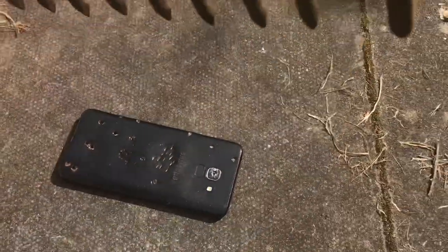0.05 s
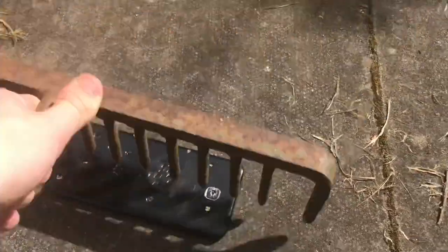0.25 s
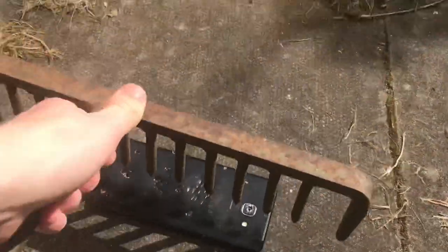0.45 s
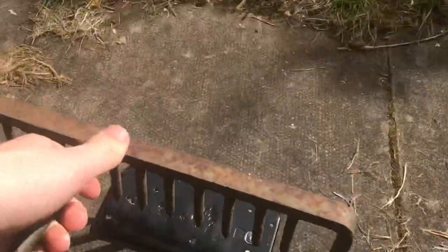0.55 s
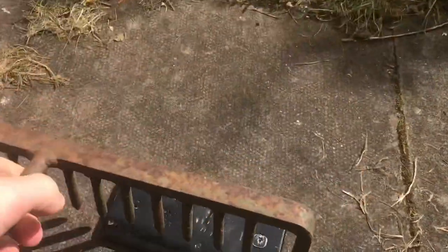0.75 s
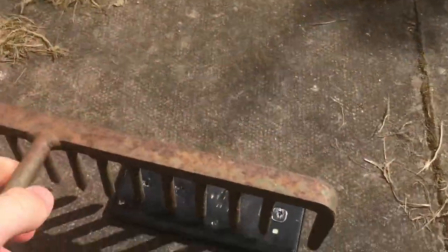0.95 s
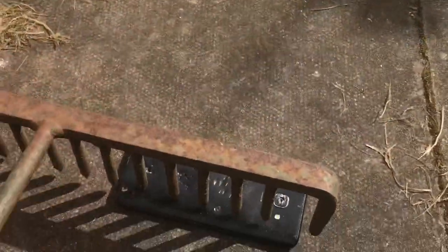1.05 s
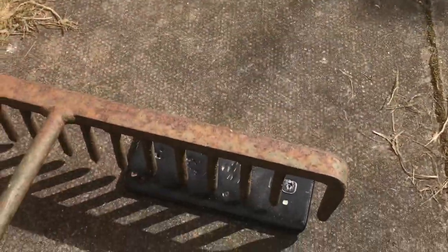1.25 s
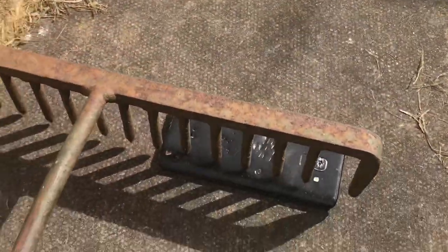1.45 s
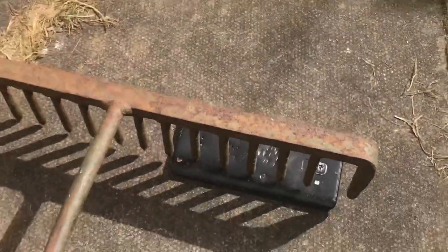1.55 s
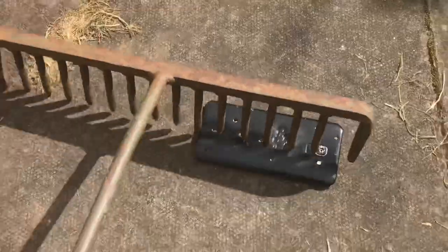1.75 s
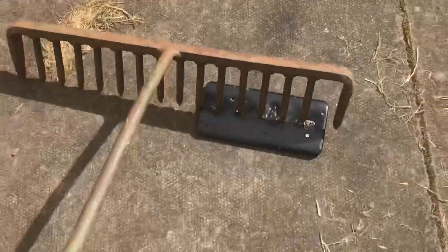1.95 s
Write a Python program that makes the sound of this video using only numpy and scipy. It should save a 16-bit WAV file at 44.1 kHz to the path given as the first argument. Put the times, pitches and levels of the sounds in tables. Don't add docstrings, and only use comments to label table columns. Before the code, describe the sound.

Steel rake head hits a concrete slab with a sharp clank, followed by gritty scraping and ticks.

```python
import sys
import numpy as np
from scipy import signal
from scipy.io import wavfile

SR = 44100
rng = np.random.default_rng(int(sys.argv[2]) if len(sys.argv) > 2 else 0)


def gain_from_decibels(decibels):
    exponent = np.asarray(decibels, float) / 20
    return 10 ** exponent


def inscribe(sig):
    pcm = np.round(np.clip(np.atleast_2d(sig).T, -1, 1) * 32767)
    wavfile.write(sys.argv[1], SR, pcm.astype(np.int16))


N = 88200
T = np.arange(N) / SR
# [f/Hz, width/Hz, level/dB]
FIRST_MODES = [(251.8, 140, -16.5), (384, 17, -6), (548.5, 20, 0), (1131, 210, -12), (1396, 160, -10.5),
               (1515, 56, -4), (1732, 28, -2.5), (2690, 60, -16.5), (5630, 33, -20.5), (8360, 70, -28)]
# [f/Hz, width/Hz, level/dB]
SECOND_MODES = [(558.5, 14.8, -1), (1170, 40, 0.5), (1581, 54, 3), (1870, 59, -0.5), (2047, 40, 0),
                (2352, 250, -9), (5830, 50, -6), (8080, 110, -7.5), (8610, 82, -7.5), (12440, 33, -14),
                (13220, 210, -17), (14201, 63, -11)]


def evened(x):
    return x / np.sqrt(np.mean(x ** 2) + 1e-20)


def curve(rows, axis):
    rows = np.array(rows)
    return np.interp(T, rows[:, 0], rows[:, axis], left=-120, right=-120)


def colour(x, points):
    f, db = np.transpose(points)
    hz = np.fft.rfftfreq(1024, 1 / SR)
    logs = np.log(gain_from_decibels(np.interp(np.log(hz + 1), np.log(f + 1), db)))
    full = np.concatenate([logs, logs[-2:0:-1]])
    taps = np.fft.ifft(np.exp(np.conj(signal.hilbert(full)))).real
    return signal.oaconvolve(x, taps / np.linalg.norm(taps))[:N]


def modes(x, table, widen):
    click = np.eye(1, 8000)[0]
    response = 0
    for k, (hz, width, db) in enumerate(table):
        r = np.exp(-np.pi * width * widen / SR)
        poles = [1, -2 * r * np.cos(2 * np.pi * hz / SR), r * r]
        response = response + (-1) ** k * gain_from_decibels(db) * (1 - r) * signal.lfilter([1, 0, -1], poles, click)
    return signal.oaconvolve(x, response / np.linalg.norm(response))[:N]


def band(x, lo_hz, hi_hz):
    return signal.sosfilt(signal.butter(2, [lo_hz, hi_hz], "band", fs=SR, output="sos"), x)


def bursts(times, dbs, length, rise):
    total = 0
    for start, db in zip(times, dbs):
        u = np.clip(T - start, 0, 1)
        total = total + gain_from_decibels(db - 8.37 * u / length) * np.minimum(u / rise, 1)
    return total


def background():
    # [t/s, f/Hz, level/dB]
    engine = [(0, 71, -44.5), (.19, 75.8, -47.5), (.3, 54.56, -62.5), (1.15, 48.42, -50.5),
              (1.3, 52.87, -50.5), (1.88, 54.6, -44.5), (2, 53.26, -53)]
    # [multiple of the firing rate, level/dB]
    orders = [(1, 2), (2, -10), (3, -18)]
    # [f/Hz, level/dB per Hz]
    air_spectrum = [(40, -3.5), (194, -14), (392, -29), (990, -24.5), (1520, -19), (1800, -33.5),
                    (16000, -52)]
    turns = np.cumsum(curve(engine, axis=1)) / SR
    hum = 0
    for k, db in orders:
        lumps_db = 2.3 * evened(band(rng.standard_normal(N), 1.4, 9))
        hum = hum + gain_from_decibels(db + lumps_db) * np.sin(2 * np.pi * k * turns)
    air = colour(rng.standard_normal(N), air_spectrum)
    return gain_from_decibels(curve(engine, axis=2) - 2) * hum + gain_from_decibels(-54.5) * evened(air)


def slide():
    # [t/s, shaft level/dB, hiss level/dB]
    rubbing = [(0, -53, -53), (.065, -71, -62), (.16, -79, -50), (.84, -66.5, -77), (.885, -73.5, -62.5),
               (.97, -53, -53), (1.105, -57, -48.5), (1.165, -62, -70.5), (1.275, -62.5, -86),
               (1.305, -53.5, -51.5), (1.42, -62, -55), (1.505, -75.5, -63), (1.79, -49, -52.5),
               (1.865, -65.5, -55.5), (2, -55.5, -54)]
    # [f/Hz, width/Hz, level/dB]
    shaft_modes = [(354.3, 43, -2.5), (1165, 26, -2.5), (1270, 41, -3.5), (1790, 180, -15),
                   (3070, 180, -20)]
    # [f/Hz, level/dB per Hz]
    hiss_spectrum = [(2000, -4), (4000, -7.5), (10500, -9), (13000, -5.5), (16000, -6)]
    rub = gain_from_decibels(curve(rubbing, axis=1) - 2.0) * rng.standard_normal(N)
    hiss = gain_from_decibels(curve(rubbing, axis=2) - 5.0) * rng.standard_normal(N)
    return modes(rub, shaft_modes, 1) + band(colour(hiss, hiss_spectrum), 1800, 16500)


def head_ring(waver_db):
    # [t/s, level/dB]
    ring = [(0, -69), (.83, -89), (.875, -61), (1.01, -57.5), (1.24, -60.5), (1.44, -70.5), (2, -65)]
    ring_hz = 1468
    return gain_from_decibels(curve(ring, axis=1) + 4 + waver_db / 2) * np.sin(2 * np.pi * ring_hz * T)


def knocks(rows, body, widen, chatter_s):
    push = np.zeros(N)
    luck = rng.random((len(rows), 2, 5))
    first = np.arange(5) == 0
    for (s, db, ms), (late, size) in zip(rows, luck):
        near = slice(round(s * SR) - 100, round(s * SR) + 900)
        late = late * np.arange(5) / 4
        size = np.where(first, 1, 2 * size - 1)
        u = (T[near, None] - s - chatter_s * late) * 1000 / np.clip(ms, .03, 2)
        shape = np.sin(np.pi * np.clip(u + .25, 0, 1))
        push[near] += gain_from_decibels(db + 20.5) * (shape / (shape.sum(0) + 1e-9)) @ size / np.linalg.norm(size)
    return modes(push, body, widen)


def catches():
    # [t/s, level/dB, contact/ms]
    touches = [(.009, -45.5, 0.15), (.02, -45, 0.26), (.033, -29.5, 0.56), (.131, -46, .1), (.19, -44, .1),
               (.202, -39.5, 0.12), (.2135, -28.5, 0.087), (.217, -27, .1)]
    # [t/s, level/dB, contact/ms]
    snags = [
        [(.384, -31, .15), (.45, -33, 0.35), (.468, -29, .3), (.481, -23, 0.51), (.508, -24.5, 0.36),
         (.5365, -22.5, 0.1), (.554, -23, 0.071), (.588, -25, 0.064), (.601, -26, 0.16), (.61, -21, 0.54),
         (.645, -24, 0.36), (.657, -20.5, 0.44), (.684, -28.5, 0.57)],
        [(1.592, -30, 0.22), (1.626, -17.5, 0.82), (1.67, -26, .12), (1.690, -30.5, .15), (1.70, -32, 0.079),
         (1.709, -34, 0.098)],
    ]
    # [t/s, level/dB, contact/ms]
    pings = [
        [(.6, -54, 0.033), (.682, -43.5, 0.023), (.72, -44, 0.024)],
        [(1.577, -44, .06), (1.5895, -28.5, 0.023), (1.596, -32, .05), (1.6225, -39, .03), (1.667, -47, 0.069),
         (1.686, -49, .03), (1.7035, -37.5, 0.029)],
    ]
    # [f/Hz, width/Hz, level/dB]
    touch_modes = [(523, 35, -2.5), (1770, 160, -2.5), (2550, 210, -1), (3217, 70, -2.5), (3930, 110, -8),
                   (5250, 140, -5.5)]
    # [f/Hz, width/Hz, level/dB]
    tine_modes = [(5060, 70, -1), (6169, 40, -5), (7185, 22, 1), (8450, 25, -4), (8757, 10, -3)]
    low = [m for m in SECOND_MODES if m[0] < 3200]
    high = [m for m in SECOND_MODES if m[0] >= 3200]
    out = knocks(touches, touch_modes, 0.83, 0.0026)
    out = out + knocks(snags[0], FIRST_MODES[:8], 1.46, 0.0054) + knocks(snags[1], low, 0.82, 0.00603)
    return out + knocks(pings[0], tine_modes, 1, 0.000277) + knocks(pings[1], high, 0.97, .004)


def ticks(rows, body_db, length):
    s, db, top_db = np.transpose(rows)
    mid = bursts(s, db, length, .0008) * rng.standard_normal(N)
    treble = bursts(s, db + top_db, length, .001) * rng.standard_normal(N)
    crack = gain_from_decibels(-4.0) * band(mid, 1500, 5700)
    return crack + gain_from_decibels(body_db) * band(mid, 500, 1000) + gain_from_decibels(-5.0) * band(treble, 5600, 19000)


def grit():
    grains_per_s, spread_db = 980, 4.5
    hits = rng.random(N) < grains_per_s / SR
    size = gain_from_decibels(spread_db * np.minimum(rng.exponential(1, N), 3.0)) * hits
    smeared = signal.lfilter([1], [1, -.88], size)
    return evened((smeared + .5) * rng.standard_normal(N))


def drag(rows, body, widen, rough_db, hiss_db, tine_db, climb_db):
    press = gain_from_decibels(curve(rows, axis=1)) * grit()
    fine = gain_from_decibels(curve(rows, axis=2)) * grit()
    press = press * gain_from_decibels(1.2 * evened(band(rng.standard_normal(N), 20, 62)))
    climb = gain_from_decibels(climb_db * (np.interp(T, [rows[0][0], rows[-1][0]], [0, 1]) - .5))
    deep = [m for m in body if m[0] < 1450]
    bright = [m for m in body if 1450 <= m[0] < 3200]
    tine = [m for m in body if m[0] >= 3200]
    head = gain_from_decibels(-0.73) * modes(press / climb, deep, widen) + gain_from_decibels(-3.4) * modes(press * climb, bright, widen)
    scrape = gain_from_decibels(rough_db) * band(press, 89, 2100) + gain_from_decibels(hiss_db) * band(fine, 2200, 12000)
    return head + scrape + gain_from_decibels(tine_db) * modes(fine, tine, 1.0)


def shaft_thuds():
    # [t/s, level/dB, f/Hz, 60 dB decay/s]
    thuds = [(0.196, -34, 535.6, 0.53), (0.2523, -8, 183.5, 0.065), (0.255, -11.5, 62.4, 0.072),
             (0.333, -34, 149.6, 0.16), (0.762, -21.5, 202, 0.021), (1.448, -39, 1850, 0.018),
             (1.4505, -32.5, 954, 0.015), (1.452, -38.5, 293, 0.021), (1.639, -38, 163, 0.085),
             (1.744, -42, 213, 0.059)]
    out = 0
    for s, db, hz, t60 in thuds:
        u = np.clip(T - s, 0, 2)
        out = out + gain_from_decibels(db - 60 * u / t60) * np.minimum(u / 0.00067, 1) * np.sin(2 * np.pi * hz * u)
    return out


def clank():
    # [t/s, peak level/dB, treble share/dB]
    blows = [(0.2371, -1, -15), (0.2408, -4.5, -3), (0.2435, 0, -5.5), (0.2459, -3, -3.5),
             (0.2519, -15.5, 12.5), (0.2553, -12, -4), (.259, -4, 1), (0.263, -8, 6.5),
             (0.268, -15.5, -2.5), (0.276, -19, 3), (.283, -15.5, -11), (0.29, -17.5, -10),
             (0.297, -25, 7.5), (0.3118, -26.5, 10)]
    # [f/Hz, width/Hz, level/dB]
    head_modes = [(576, 63, -4), (1474, 49, -9), (1700, 16, -8), (1960, 90, 6.5), (2144, 39, 6.5),
                  (2505, 60, 2.5), (3950, 430, 5), (9070, 94, -0.5)]
    # [f/Hz, level/dB per Hz]
    crash = [(200, -2.5), (800, -7), (2200, -1.5), (5000, -15.5), (14000, -22), (16000, -28)]
    s, db, top_db = np.transpose(blows)
    low = bursts(s, db, 0.0021, .0003) * rng.standard_normal(N)
    high = bursts(s, db + top_db, 0.0021, 0.0018) * rng.standard_normal(N)
    head = gain_from_decibels(-8.5) * modes(low, head_modes, 2.1)
    return head + band(colour(low, crash), 250, 5300) + gain_from_decibels(2.0) * band(colour(high, crash), 3000, 16500)


def tine_rings(waver_db):
    # [start t/s, damped t/s, f/Hz, level/dB]
    tines = [(.34, .47, 5870, -59), (.61, .69, 8757, -59), (.762, .826, 8757, -48),
             (1.731, 1.86, 1271, -55), (1.898, 1.97, 8500, -64)]
    out = 0
    for s, end, hz, db in tines:
        u = np.clip(T - s, 0, 2)
        level_db = db - 60 * u - 1670 * np.clip(T - end, 0, 1) + 2 * waver_db
        out = out + (u > 0) * gain_from_decibels(level_db) * np.sin(2 * np.pi * hz * u)
    return out


def yard(x):
    t = np.arange(6000) / SR
    tail = rng.standard_normal(6000) * gain_from_decibels(-60 * t / 0.16) * (t > .004)
    return signal.oaconvolve(x, tail / np.linalg.norm(tail))[:N]


def scene():
    # [t/s, peak level/dB, treble share/dB]
    early_ticks = [(.012, -42.5, -5), (.131, -44, -27), (.2135, -20.5, -9), (.336, -22.5, -2),
                   (.385, -38, 0), (.5085, -26.5, -16), (.540, -22.5, -5), (.554, -18, -9.5),
                   (.588, -55.5, 29.5), (.595, -14, -40), (.603, -18.5, -7), (.652, -27, -20),
                   (.681, -44, 4), (.761, -33.5, 4), (.775, -13, -7), (.783, -56, 22), (.798, -56, -8),
                   (.8083, -29.5, -1), (.8255, -27, -13), (.841, -51.5, -12), (.9175, -42.5, -10)]
    # [t/s, peak level/dB, treble share/dB]
    late_ticks = [(1.447, -38.5, -18), (1.452, -40, 0), (1.576, -39, -1), (1.622, -31, 7.5),
                  (1.699, -30.5, 4), (1.731, -29, -6), (1.744, -23.5, -3), (1.7475, -31.5, -10),
                  (1.755, -38, -6), (1.765, -48, -14), (1.838, -37, -5), (1.897, -37, 0), (1.9765, -28, -1),
                  (1.985, -32.5, -4)]
    # [t/s, pressure level/dB, grit hiss level/dB]
    strokes = [
        [(.19, -50.5, -52.5), (.214, -38.5, -47.5), (.29, -35, -44), (.41, -44.5, -70), (.48, -41, -63),
         (.61, -36.5, -51), (.68, -39.5, -61), (.745, -51, -54), (.8, -42.5, -60), (.85, -53, -74)],
        [(1.545, -59, -72), (1.587, -60, -70), (1.591, -38, -37.5), (1.619, -37, -51), (1.624, -39, -42.5),
         (1.665, -38, -53), (1.706, -39, -50.5), (1.762, -50, -63), (1.775, -56, -80)],
    ]
    waver_db = evened(band(rng.standard_normal(N), 10, 60))
    rake = head_ring(waver_db) + catches() + shaft_thuds() + clank() + tine_rings(waver_db)
    rake = rake + ticks(early_ticks, -0.49, 0.0041) + ticks(late_ticks, 0.5, 0.0027)
    rake = rake + drag(strokes[0], FIRST_MODES, widen=1.1, rough_db=-0.5, hiss_db=-1.6,
                       tine_db=-13.5, climb_db=0.1)
    rake = rake + drag(strokes[1], SECOND_MODES, widen=0.65, rough_db=-0.44, hiss_db=-2.2,
                       tine_db=3.0, climb_db=6.0)
    return (rake + gain_from_decibels(-10.5) * yard(rake) + slide() + background())[None]


def top_cut(x):
    return signal.sosfilt(signal.butter(12, 16980, fs=SR, output="sos"), x)


def record(dry):
    x = signal.sosfilt(signal.butter(3, 42., "high", fs=SR, output="sos"), dry)
    x = np.tanh(x / .95) * .95
    x = signal.oaconvolve(x, signal.firwin(255, 15900, fs=SR)[None], "same")
    return top_cut(x)


dry = scene()
out = record(dry)
inscribe(out)
```